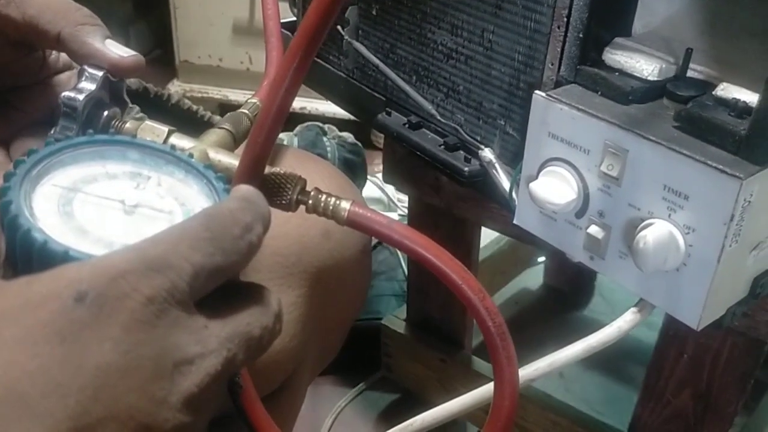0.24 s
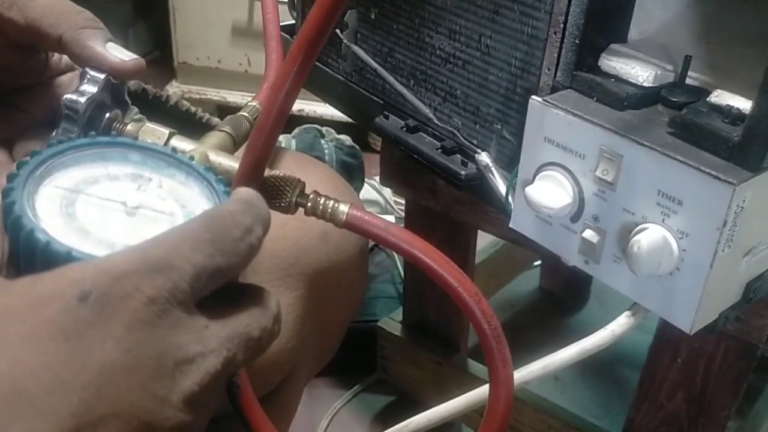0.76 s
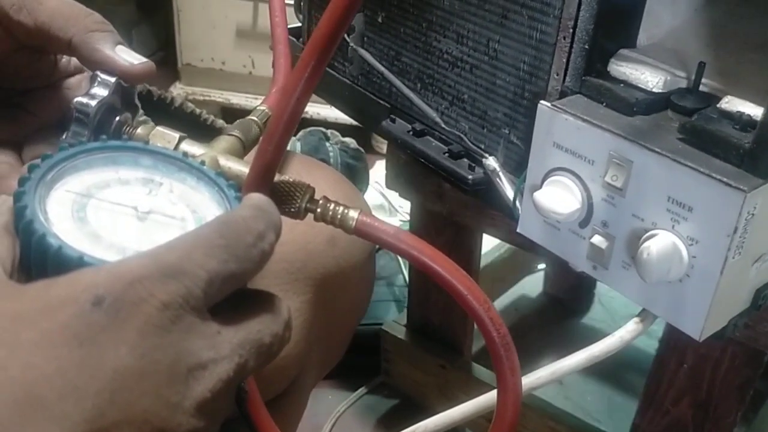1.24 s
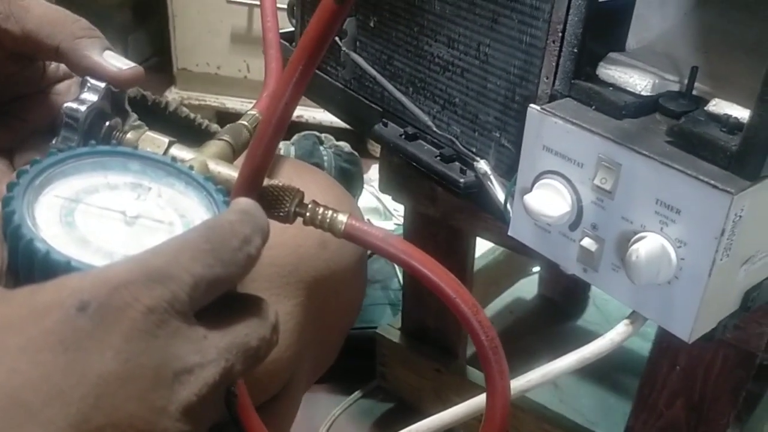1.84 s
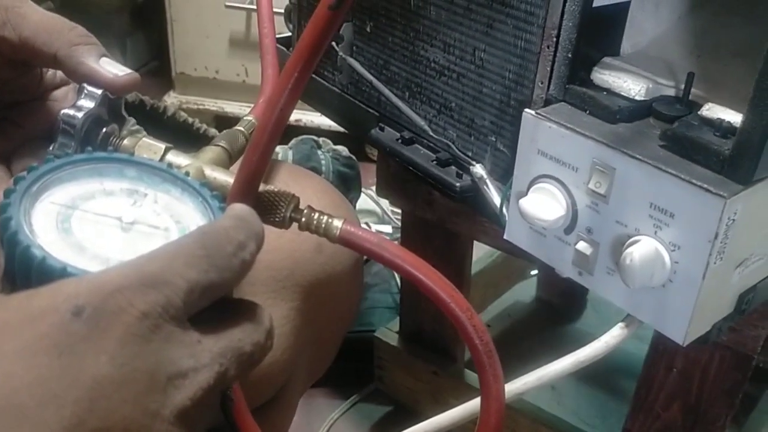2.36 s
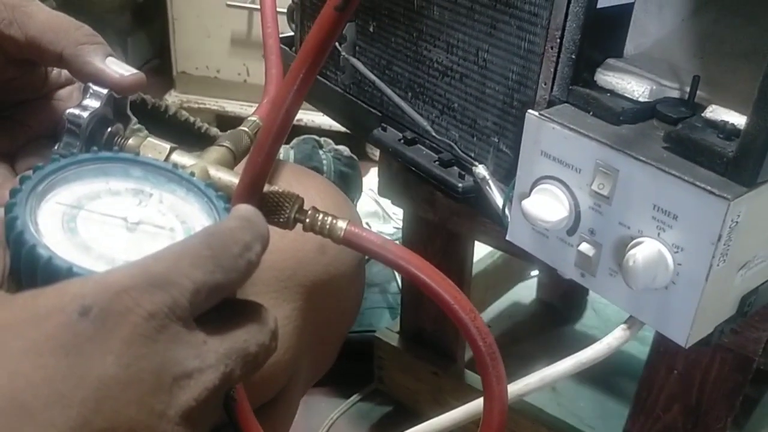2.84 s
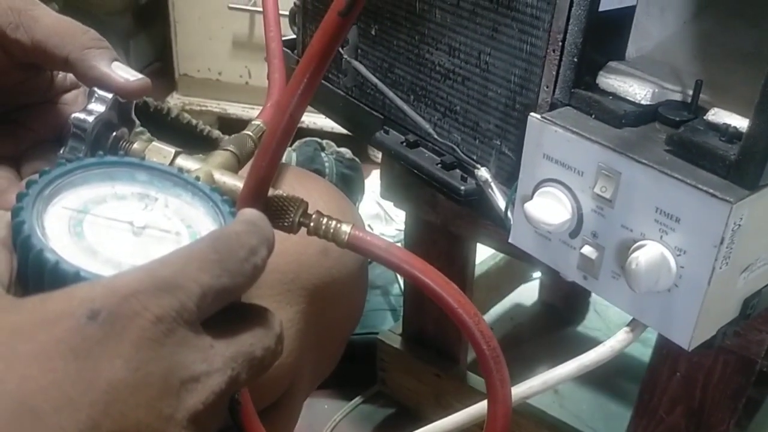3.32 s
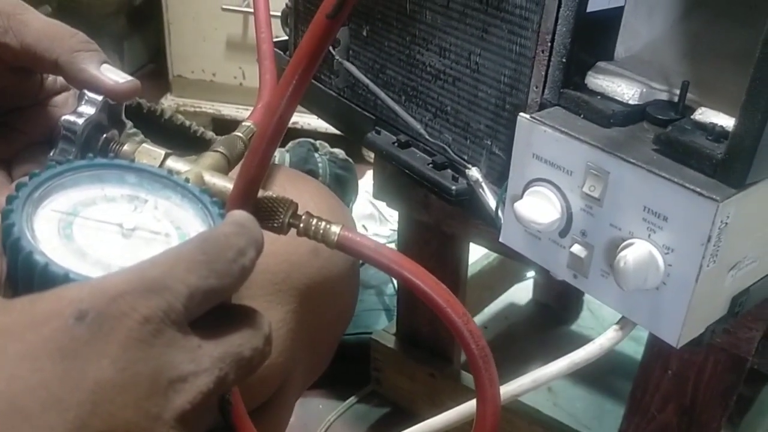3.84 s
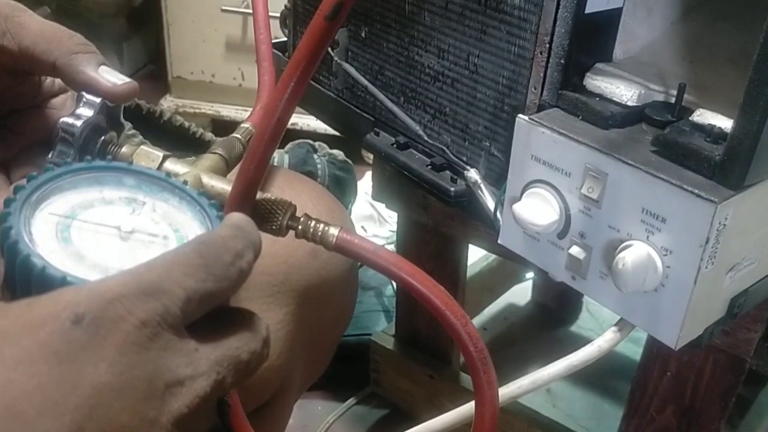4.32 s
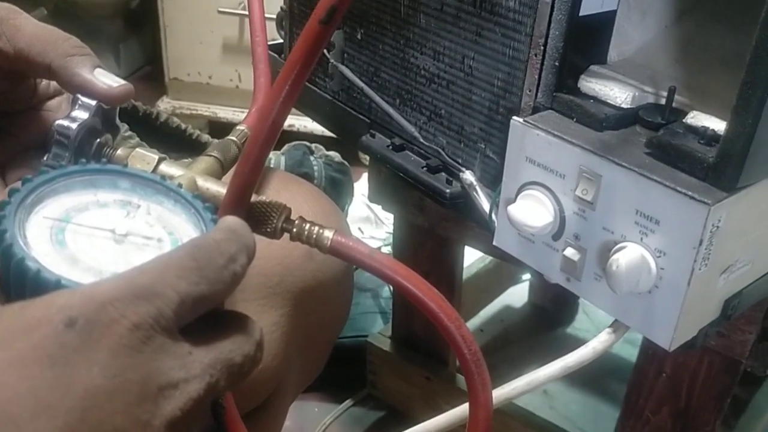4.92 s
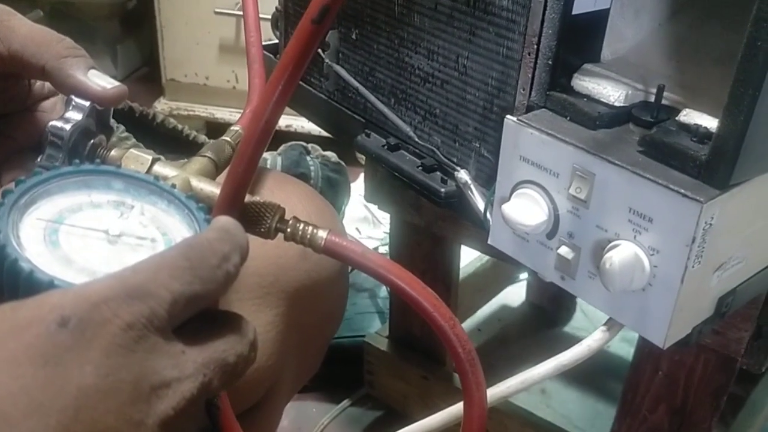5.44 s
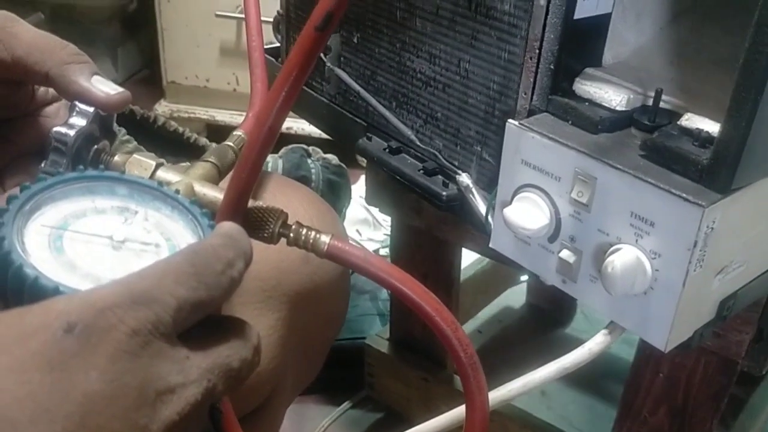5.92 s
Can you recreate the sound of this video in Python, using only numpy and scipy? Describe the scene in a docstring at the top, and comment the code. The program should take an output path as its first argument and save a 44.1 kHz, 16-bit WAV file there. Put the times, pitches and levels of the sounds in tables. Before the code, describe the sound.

Low, uneven wind rumble hits the microphone from the fan of a window air conditioner running close by in a room. Quick gusts and sudden thumps keep coming, and the hardest briefly push the other sounds down. Behind them are a constant high compressor hum, a softer rush of air and a thin refrigerant hiss, with a light tick near the start and occasional faint whistles.

```python
"""Indoors, close to an opened, running window air conditioner.
Its fan stream buffets the microphone with short gusts and sharp eddies, and the compressor sings on high
multiples of its shaft speed. Behind them air rushes through the coil, refrigerant hisses in narrow tubes,
faint whistles come and go, and one dull tick sounds.
The hardest eddies push a limiter down, so hum and hiss duck and swell back."""
import sys
import numpy as np
from scipy import signal
from scipy.fft import rfft, irfft, next_fast_len
from scipy.io import wavfile
from scipy.ndimage import uniform_filter1d, minimum_filter1d, map_coordinates

SR = 44100
rng = np.random.default_rng(int(sys.argv[2]) if len(sys.argv) > 2 else 0)


def digitize_waveform(pressure):
    """Quantize a signal to 16-bit integers and store it at the path in sys.argv[1].

    Rows of a 2-D input are taken as channels; values are limited to [-1, 1].
    """
    field = np.atleast_2d(pressure).T
    bounded = np.clip(field, -1, 1)
    quanta = np.round(bounded * 32767).astype(np.int16)
    wavfile.write(sys.argv[1], SR, quanta)


N = 272260
TIME = np.arange(N) / SR
FFT_SIZE = next_fast_len(N, real=True)
FREQS = np.fft.rfftfreq(FFT_SIZE, 1 / SR)


# Bed of the fan stream between gusts: (time [s], relative level [dB])
STREAM_BED = [(0.0, -24), (0.4, -19.5), (0.85, -23), (1.7, -21), (2.3, -22.5), (2.7, -20.5), (3.7, -23.5),
              (3.92, -23.5), (4.3, -23.0), (4.9, -24.5), (5.2, -20.5), (5.45, -24.5), (5.8, -20.5),
              (6.0, -27), (6.17, -19.5)]
# Gusts that hit the microphone: (time [s], relative level [dB], length [s])
GUST_HITS = [(0.195, -11.0, 0.0505), (0.476, -16.5, 0.0399), (0.554, -14.0, 0.0215), (0.701, -14.5, 0.0398),
             (0.757, -15.0, 0.0258), (0.945, -14.5, 0.0449), (1.051, -16.5, 0.0487), (1.243, -18.0, 0.0838),
             (1.465, -15.0, 0.0244), (1.561, -17.5, 0.023), (1.674, -18.5, 0.0746), (1.777, -17.5, 0.04),
             (1.819, -15.0, 0.0302), (1.954, -12, 0.0428), (2.009, -16.5, 0.0236), (2.137, -17.0, 0.0318),
             (2.642, -16.5, 0.05), (2.706, -18.5, 0.08), (2.776, -16.5, 0.025), (2.966, -15.5, 0.0542),
             (3.008, -14.0, 0.0389), (3.171, -15.0, 0.024), (3.268, -15, 0.025), (3.315, -16.0, 0.0605),
             (3.42, -12.0, 0.0334), (3.575, -15.5, 0.0311), (3.669, -18, 0.0402), (3.737, -16.5, 0.0766),
             (4.074, -16.0, 0.067), (4.316, -17.0, 0.0387), (4.408, -13.5, 0.02565), (4.486, -15.5, 0.0372),
             (4.61, -17.0, 0.0805), (4.704, -11.0, 0.02687), (4.803, -17.0, 0.0779),
             (4.998, -15.0, 0.02666), (5.312, -16.5, 0.0621), (5.667, -14.5, 0.0543),
             (5.807, -14.5, 0.0261), (5.868, -14.5, 0.0232), (5.933, -12.5, 0.044), (6.129, -12.0, 0.05225)]


def fan_stream_db(puffs_per_s=17, ripple_db=4.6, jitter=0.3):
    """Envelope of the air at the microphone: a bed rippled by weak puffs, plus bell-shaped gusts."""
    puff_cycles = np.cumsum(puffs_per_s * np.exp(jitter * drift(hz=8))) / SR
    ripple = np.sin(2 * np.pi * (puff_cycles + rng.random()))
    power = amp(automation(STREAM_BED) + ripple_db * ripple) ** 2
    for at, db, length in GUST_HITS:
        near = slice(max(int((at - 2 * length) * SR), 0), int((at + 2 * length) * SR))
        power[near] += amp(db) ** 2 * np.exp(-2 * (2 * (TIME[near] - at) / length) ** 2)
    return 10 * np.log10(power)


# Rumble of the turbulence at mean air speed: (frequency [Hz], relative level [dB])
RUMBLE_EQ = [(5, -3), (18, -0.5), (35, 0.5), (70, -1), (110, -3), (170, -7), (250, -13), (400, -22.5),
             (600, -33.5), (1000, -54), (2500, -68)]


def buffeting(trim_db=1.04, follow=0.82, roughness_db=1.32, sweep=0.25, sub_hz=55, sub_follow=0.75):
    """Turbulence carried past the microphone: faster air is both louder and brighter."""
    stream_db = fan_stream_db()
    gust_db = follow * (stream_db - stream_db.mean()) + roughness_db * drift(hz=45)
    speed = amp(sweep * gust_db)
    travelled = np.cumsum(speed / speed.mean()) / SR
    pressure = np.interp(travelled, TIME, noise(RUMBLE_EQ))
    # the largest whirls outlast the gusts and follow them less
    sub = signal.sosfiltfilt(signal.butter(2, sub_hz, fs=SR, output="sos"), pressure)
    rumble = amp(gust_db) * (pressure - sub) + amp(sub_follow * gust_db) * sub
    return amp(stream_db.mean() + trim_db) * rumble


# Thumps of the hardest eddies: (time [s], peak before the limiter [dB], nominal half length [s])
EDDY_HITS = [(.189, -5, .0011), (.470, -11.5, 0.0011), (.550, -3.5, 0.0014), (.692, -3, 0.0016),
             (0.758, -7, 0.0013), (1.058, -12, 0.0015), (1.556, -4.5, 0.0025), (1.945, -7.5, .0013),
             (2.139, -2, 0.0019), (2.52, -9.5, .0015), (2.778, -3, 0.0037), (3.018, -3, 0.0018),
             (3.411, -9, 0.0013), (3.671, -10, 0.0016), (4.531, -18, 0.00082), (4.7, -8.5, 0.0013),
             (4.785, -9, .0017), (4.843, -1.5, 0.003), (5.309, -9, 0.0018), (5.929, -3.5, .002)]


def eddies(stretch=0.94, max_lean_rad=2.0):
    """Each eddy is one smooth swing between suction and push, lopsided by chance."""
    out = np.zeros(N)
    leans = rng.uniform(-max_lean_rad, max_lean_rad, len(EDDY_HITS))
    for (at, db, half_length), lean in zip(EDDY_HITS, leans):
        near = slice(max(int((at - 0.05) * SR), 0), int((at + 0.05) * SR))
        passage = (TIME[near] - at) / (half_length * stretch)
        swing = (np.exp(1j * lean) / (1 - 1j * passage) ** 2).imag
        out[near] += amp(db) * swing / abs(swing).max() * np.hanning(len(swing))
    return out


# Partials of the compressor hum: (multiple of shaft speed [x], relative level [dB])
HUM_PARTIALS = [(10, -57.0), (13, -60.2), (14, -58.9), (16, -52.4), (17, -49.7), (18, -59.7), (19, -46.3),
                (20, -67.2), (21, -61.9), (22, -71.9), (23, -64.3), (24, -63.3), (25, -67.1), (26, -65.0),
                (27, -62.2), (28, -72.3), (29, -70.5), (30, -63.9), (31, -67.0), (32, -72.5), (33, -66.8),
                (40, -70.2), (43, -62.2), (44, -70.6), (45, -68.4), (47, -65.3), (52, -72.0)]


def compressor(turns, trim_db=0.32, waver=0.17, waver_hz=3.5, skirt_floor_db=-69, skirt_bins=256):
    """The compressor sings on harmonics of its shaft, each with a faint noise skirt that makes it waver."""
    mean_hz = turns[-1] / TIME[-1]
    loop_turns = round(mean_hz * FFT_SIZE / SR)  # whole turns, for a seamless loop
    offsets = np.arange(skirt_bins) - skirt_bins // 2
    skirt = (offsets != 0) / (1 + (offsets * SR / FFT_SIZE / waver_hz) ** 2)
    skirt /= np.linalg.norm(skirt) * np.sqrt(2)
    spectrum = np.zeros(len(FREQS), complex)
    for multiple, db in HUM_PARTIALS:
        wobble = np.hypot(waver * amp(db), amp(skirt_floor_db)) * random_bins(skirt_bins) * skirt
        tone = (offsets == 0) * amp(db) * np.exp(2j * np.pi * rng.random())
        spectrum[round(multiple) * loop_turns + offsets] += tone + wobble
    loop = irfft(spectrum) * FFT_SIZE / np.sqrt(2)
    playhead = turns / loop_turns * FFT_SIZE  # pitch rides the shaft speed
    return amp(trim_db) * map_coordinates(loop, [playhead], order=3, mode="wrap")


# Pace of the compressor shaft: (time [s], speed [turns/s])
SHAFT_SPEED = [(0, 58.6366), (2, 58.64), (4, 58.6477), (6.17, 58.661)]


def shaft_turns():
    """Running count of shaft turns, the clock for the hum and for the throb in the hiss."""
    return np.cumsum(automation(SHAFT_SPEED)) / SR


# Tone of the air through blower and fins: (frequency [Hz], relative level [dB])
RUSH_EQ = [(60, 0), (300, -3.5), (600, -2), (850, -0.5), (1050, -3.5), (1300, -13), (1550, -9), (2000, -14),
           (2800, -14), (3100, -18), (3700, -17.5), (5800, -22), (9500, -21), (13000, -24)]
# Slow swell of the blower's treble: (time [s], gain [dB])
TREBLE_SWELL = [(0.0, 2), (0.77, -1.5), (1.54, -0.5), (2.31, 0), (3.08, -0.2), (3.86, 0.5), (4.63, -0.5),
                (5.4, 0), (6.17, 2)]


def air_rush(level_db=-42.5, flutter_db=1.24, flutter_hz=22, treble_hz=2600):
    """The steady rush of the blower; its treble flutters and swells slowly with the airflow."""
    air = amp(level_db) * np.array([noise(RUSH_EQ), noise(RUSH_EQ)])
    treble = signal.sosfiltfilt(signal.butter(2, treble_hz, "high", fs=SR, output="sos"), air)
    treble_gain = amp(automation(TREBLE_SWELL) + flutter_db * drift(flutter_hz))
    return air + treble * (treble_gain - 1)


# Slow swell of the flow through the tubes: (time [s], gain [dB])
FLOW_SWELL = [(0.0, 1), (0.77, 1.5), (1.54, 0.5), (2.31, 0), (3.08, 1), (3.86, 0.7), (4.63, -0.5),
              (5.4, 1.7), (6.17, -1.0)]
# Resonances of the hiss: (centre [Hz], nominal width [Hz], relative level [dB], flutter [dB])
TUBE_BANDS = [(3675, 87, -70, 1), (4026, 470, -67.5, 2.5), (4350, 85, -68.5, 2), (4780, 840, -66.5, 3.5),
              (7940, 840, -60.5, 2), (8560, 690, -60.5, 3), (9340, 600, -70.5, 3.5), (11970, 370, -64.5, 4),
              (12160, 140, -63.5, 3.5)]


def refrigerant_hiss(turns, throb=0.063, flutter_hz=13, surge_db=0.74, surge_hz=20):
    """Refrigerant hisses in fluttering resonances, surges at random and throbs twice a shaft turn."""
    flow_db = automation(FLOW_SWELL) + surge_db * drift(surge_hz)
    hiss = np.zeros((2, N))
    for hz, width, db, flutter_db in TUBE_BANDS:
        gain = amp(db + flutter_db * drift(flutter_hz))
        hiss += gain * np.array([noise_band(hz, width), noise_band(hz, width)])
    return hiss * amp(flow_db) * (1 + throb * np.cos(4 * np.pi * turns))


# Faint whistles in the rush: (centre time [s], length [s], pitch [Hz], wander width [Hz], level [dB])
WHISTLE_CUES = [(0.746, 0.45, 644, 29.5, -44), (1.891, 0.38, 870, 40.3, -43.5),
                (3.655, 0.17, 2540, 25, -61), (3.95, 0.15, 2470, 29.8, -55), (4.296, 0.17, 1055, 24.6, -48),
                (5.455, 0.19, 1050, 24.5, -47), (5.562, 0.22, 945, 50, -46),
                (6.101, 0.288, 710, 34.4, -44.5)]


def whistles():
    """Soft tones of wandering pitch swell out of the rush and sink back."""
    out = np.zeros(N)
    for at, length, hz, width, db in WHISTLE_CUES:
        near = abs(TIME - at) < length / 2
        knots = at + length * np.linspace(-0.5, 0.5, 16)
        pitch = hz + width / 2 * np.interp(TIME[near], knots, rng.standard_normal(len(knots)))
        tone = np.sqrt(2) * np.sin(2 * np.pi * np.cumsum(pitch) / SR)
        out[near] += amp(db) * np.hanning(len(tone)) * tone
    return out


# Ring of a small dull tick: (frequency [Hz], relative level [dB], decay [s])
TICK_MODES = [(710, -17, 0.0038), (1160, -20, 0.0019), (2190, -16, 0.00062)]


def tick(at_s=0.692, attack_s=0.00031):
    """One light, soft-edged knock rings a few damped modes."""
    out = np.zeros(N)
    age = TIME[:SR // 10]
    ring = sum(amp(db) * np.exp(-age / decay) * np.sin(2 * np.pi * hz * age)
               for hz, db, decay in TICK_MODES)
    attack = 1 - np.exp(-(age / attack_s) ** 2)
    out[round(at_s * SR):][:len(age)] = ring * attack
    return out


# Likeness of left and right in the rush and hiss: (frequency [Hz], coherence [0..1])
STEREO_COHERENCE = [(4000, 1), (4400, 0.88), (6000, 0.28), (8200, 0.42), (11000, 0.25), (12100, 0.78),
                    (13000, .7)]


def widen(pair):
    """Two unrelated noises become mid and side: mono in the bass, wide in the treble."""
    coherence = np.clip(over_frequency(STEREO_COHERENCE), 0, 1)
    weights = np.sqrt([(1 + coherence) / 2, (1 - coherence) / 2])
    mid, side = irfft(rfft(pair, FFT_SIZE) * weights)[:, :N]
    return np.array([mid + side, mid - side])


def amp(db):
    """Decibels to gain."""
    return 10 ** (np.asarray(db) / 20)


def unit_rms(x):
    """Scales to an rms of one."""
    return x / np.sqrt(np.mean(x ** 2) + 1e-20)


def automation(rows):
    """Joins (time [s], value) rows by straight lines."""
    return np.interp(TIME, *np.transpose(rows))


def over_frequency(rows):
    """Joins (frequency [Hz], value) rows on a log-frequency axis."""
    hz, value = np.transpose(rows)
    return np.interp(np.log(FREQS + 1), np.log(hz + 1), value)


def random_bins(count):
    """A white spectrum of random sizes and phases."""
    return rng.standard_normal(2 * count).view(complex)


def noise(eq):
    """Noise of rms one, coloured by an EQ curve."""
    return unit_rms(irfft(random_bins(len(FREQS)) * amp(over_frequency(eq)))[:N])


def noise_band(hz, width, count=16384):
    """Noise of rms one in a single soft-shouldered resonance."""
    offset_hz = np.fft.fftfreq(count, FFT_SIZE / SR / count)
    bins = np.round((hz + offset_hz) * FFT_SIZE / SR).astype(int)
    spectrum = np.zeros(len(FREQS), complex)
    spectrum[abs(bins)] = random_bins(count) / (1 + (offset_hz / (0.6 * width)) ** 2) ** 1.6
    return unit_rms(irfft(spectrum)[:N])


def drift(hz, count=2048):
    """Smooth random modulation that rolls off above hz."""
    rates = np.fft.rfftfreq(count, TIME[-1] / count)
    slow = irfft(rfft(rng.standard_normal(count)) * (rates > 0) / (1 + (rates / hz) ** 2))
    return np.interp(TIME, np.linspace(0, TIME[-1], count), unit_rms(slow))


def scene():
    """Wind, hum, whistles and tick sit in the centre; rush and hiss spread around them."""
    turns = shaft_turns()
    centre = buffeting() + eddies() + compressor(turns) + whistles() + tick()
    return centre + widen(air_rush() + refrigerant_hiss(turns))


def record(dry, threshold_db=-6.3, hold_s=0.014, release_db_per_s=40, fade_s=0.003, cutoff_hz=13090):
    """A limiter catches each peak, holds and releases slowly; then short end fades and a high cut."""
    peak_db = 20 * np.log10(abs(dry).max(0) + 1e-9)
    over_db = np.maximum(peak_db - threshold_db, 0)
    half_hold = int(hold_s * SR / 2)
    held_db = -minimum_filter1d(-over_db, size=2 * half_hold + 1, origin=half_hold)
    release_db = release_db_per_s * TIME
    duck_db = np.maximum.accumulate(held_db + release_db) - release_db
    look_ahead_db = uniform_filter1d(duck_db, size=81, origin=-40)
    eased_db = uniform_filter1d(look_ahead_db, size=61)
    fades = np.clip(np.minimum(TIME, TIME[::-1]) / fade_s, 0, 1)
    high_cut = signal.firwin(1023, cutoff_hz, window=("kaiser", 9), fs=SR)
    return signal.oaconvolve(dry * amp(-eased_db) * fades, high_cut[None], "same", axes=1)


dry = scene()
out = record(dry)
digitize_waveform(out)
```